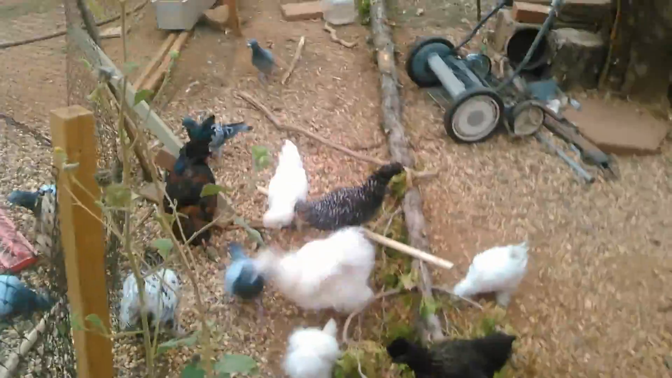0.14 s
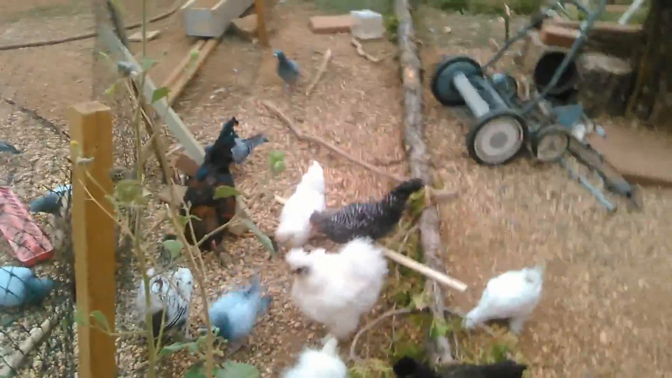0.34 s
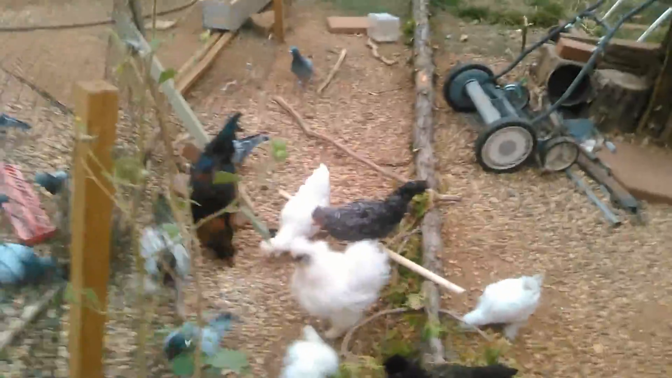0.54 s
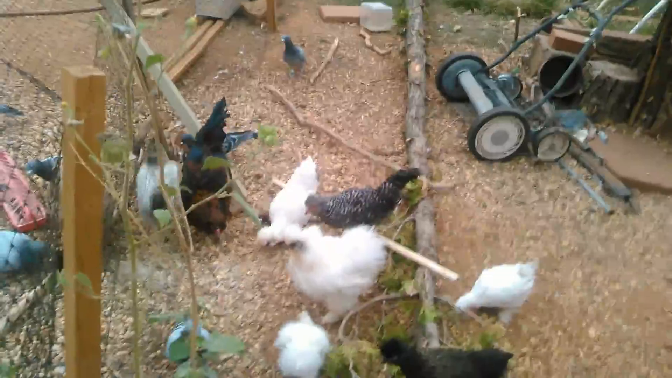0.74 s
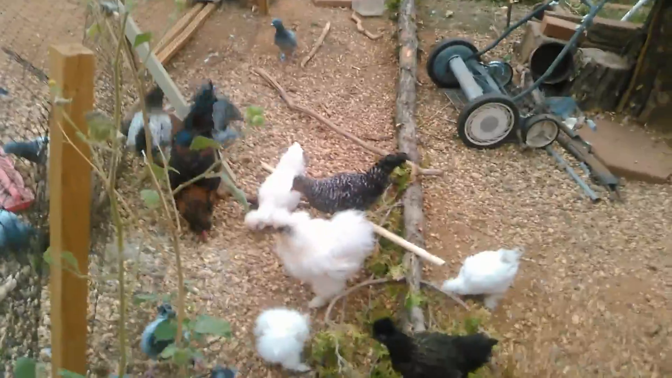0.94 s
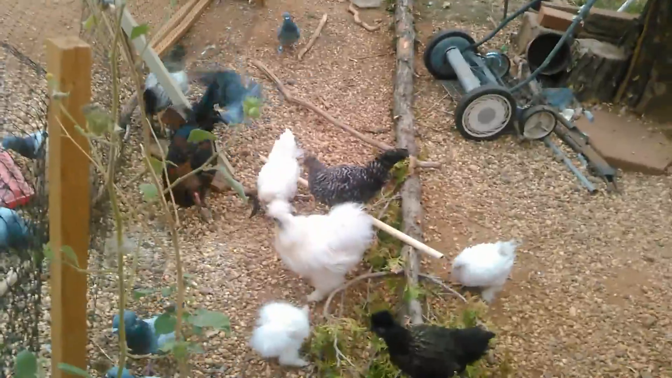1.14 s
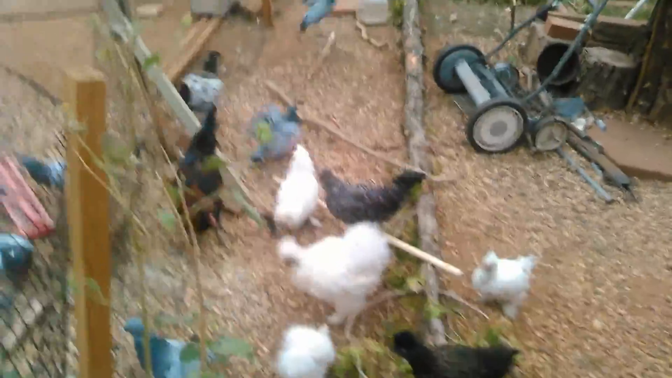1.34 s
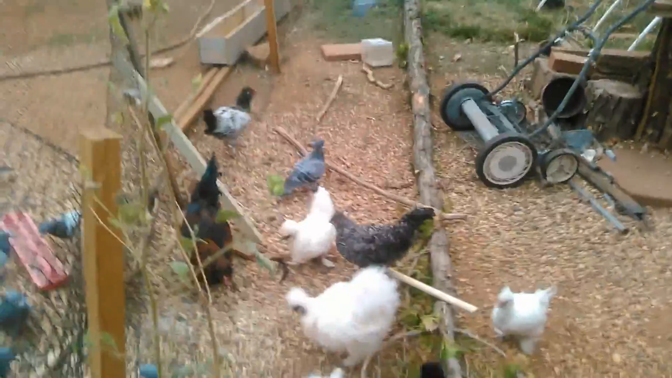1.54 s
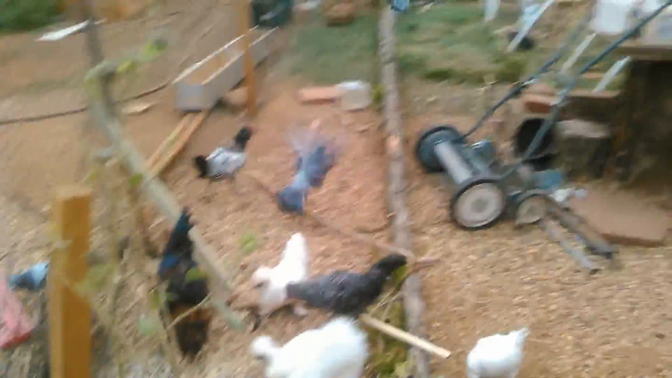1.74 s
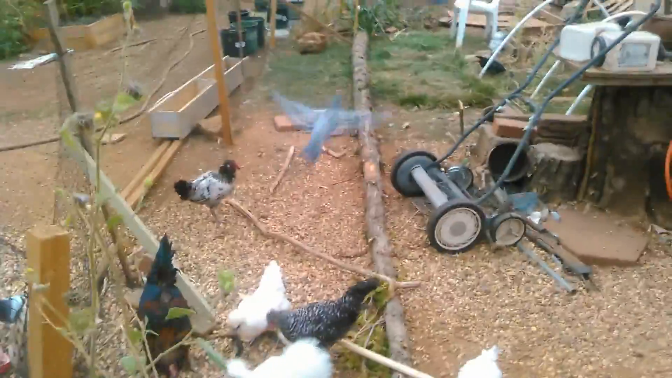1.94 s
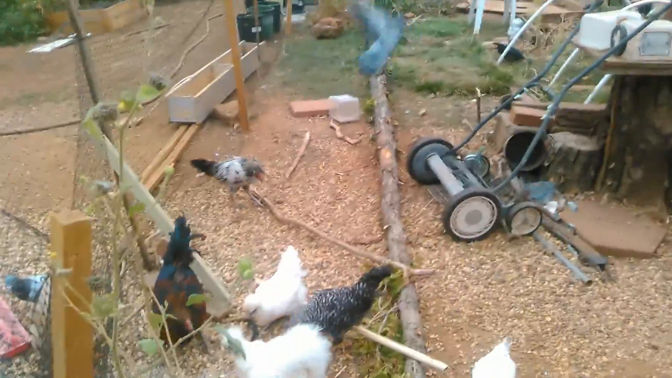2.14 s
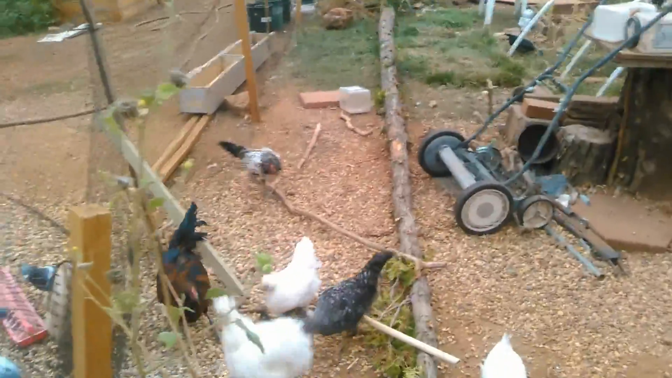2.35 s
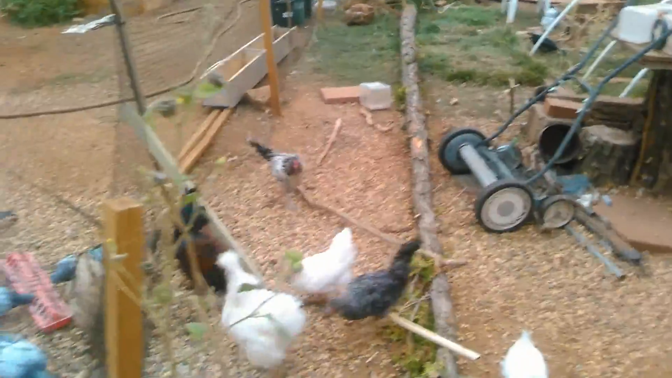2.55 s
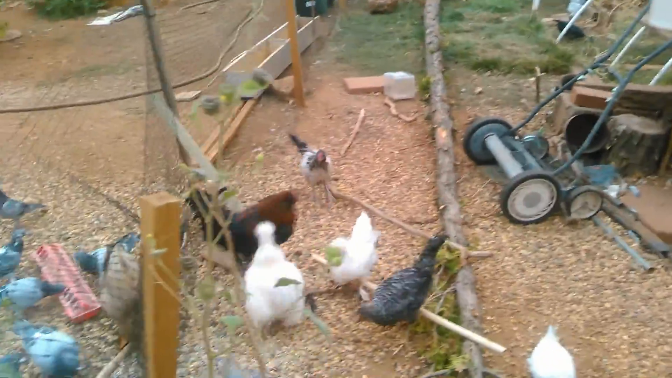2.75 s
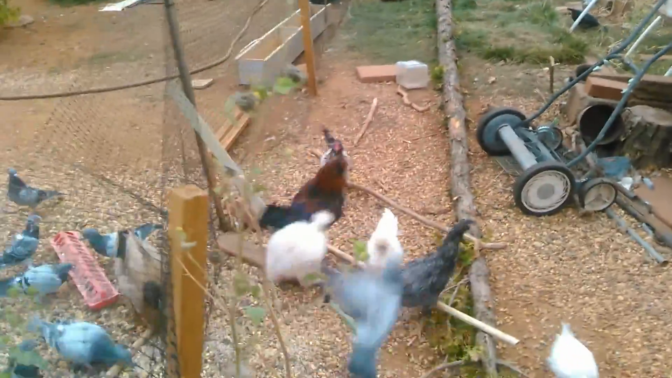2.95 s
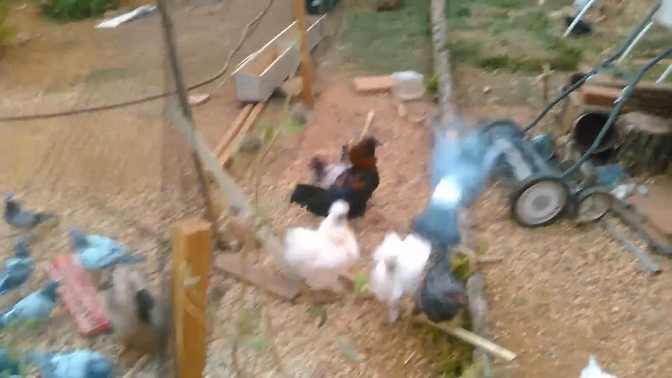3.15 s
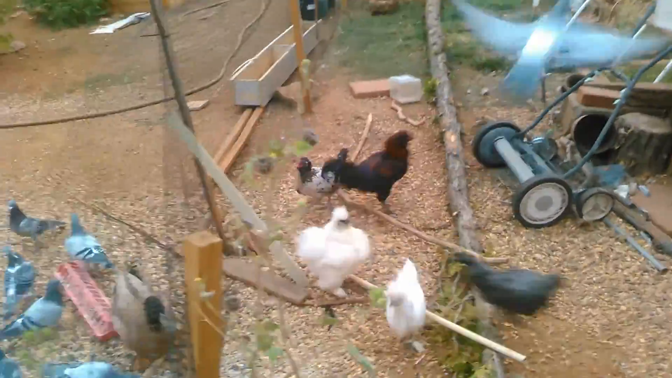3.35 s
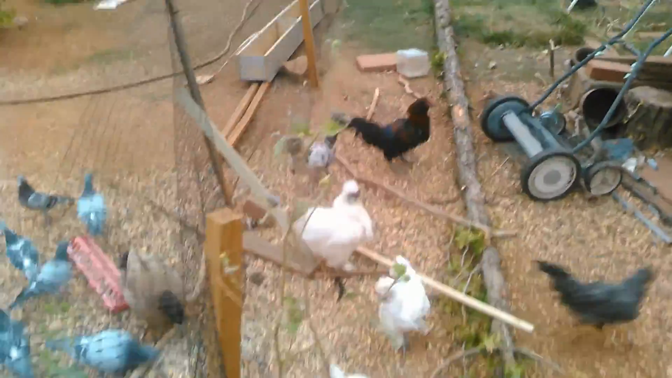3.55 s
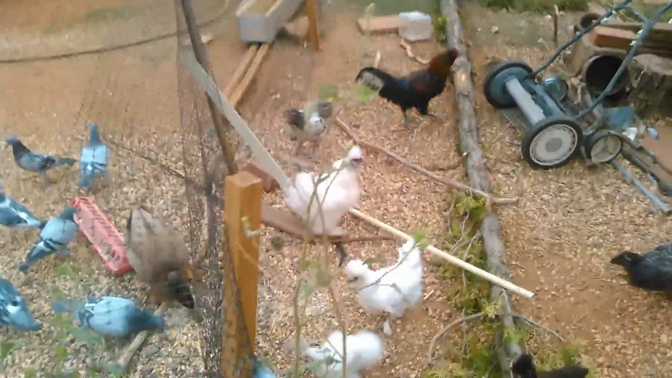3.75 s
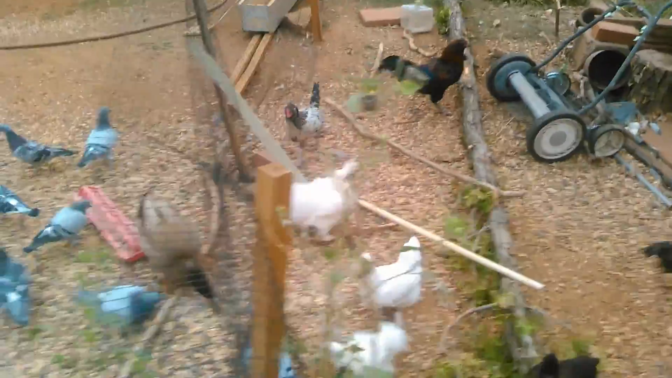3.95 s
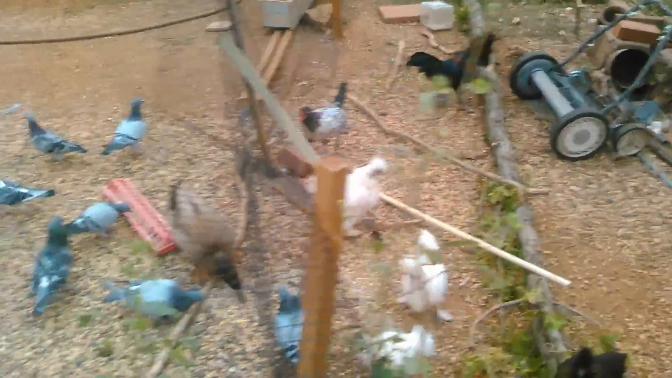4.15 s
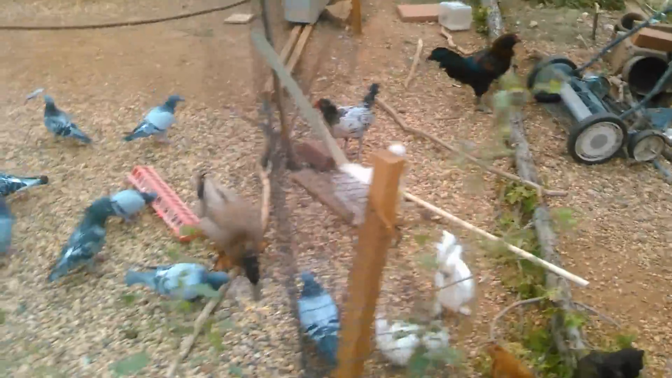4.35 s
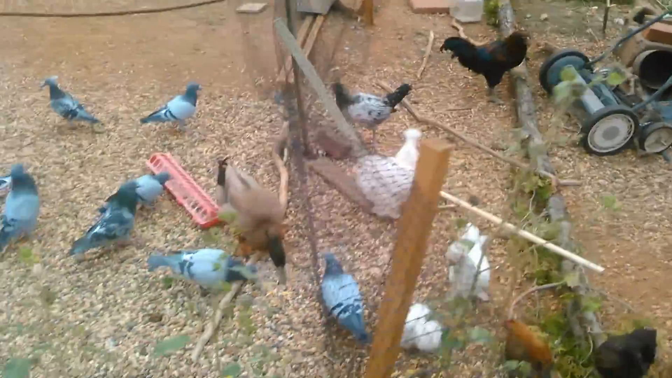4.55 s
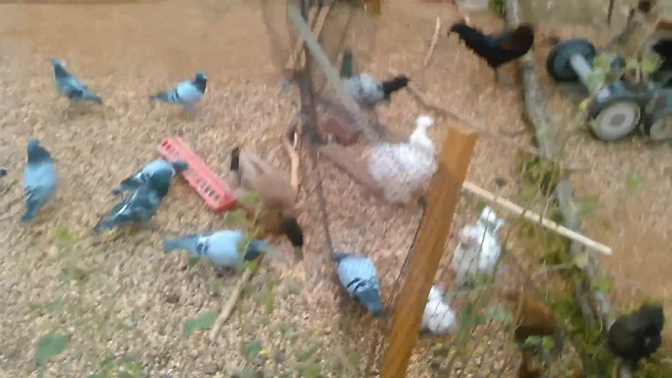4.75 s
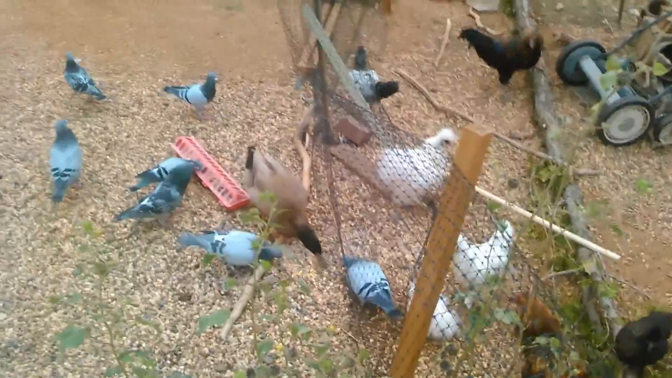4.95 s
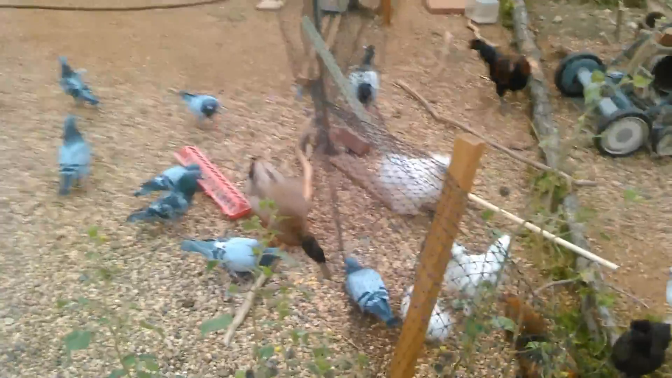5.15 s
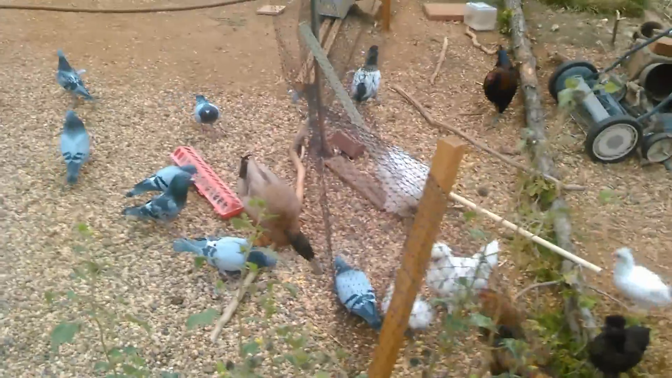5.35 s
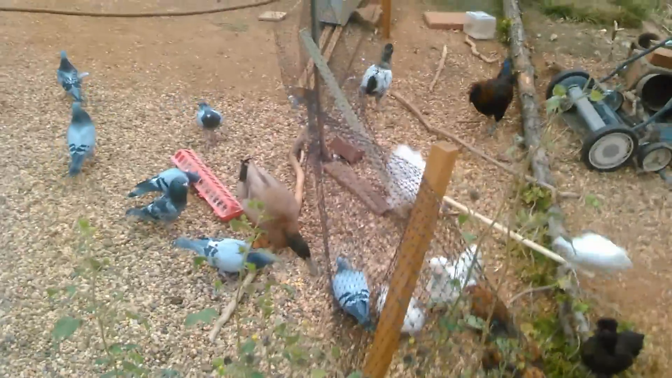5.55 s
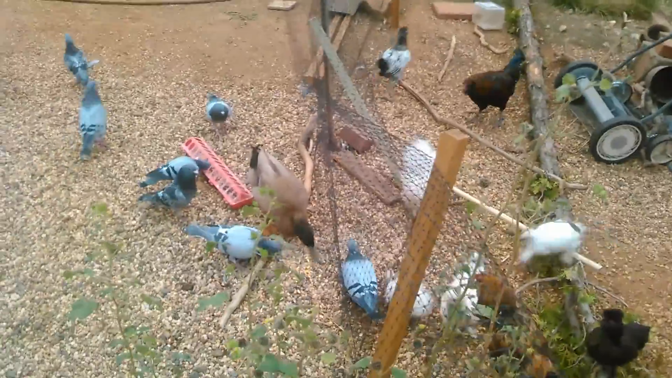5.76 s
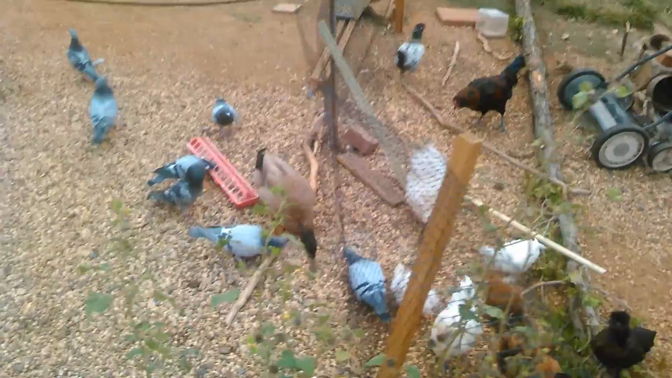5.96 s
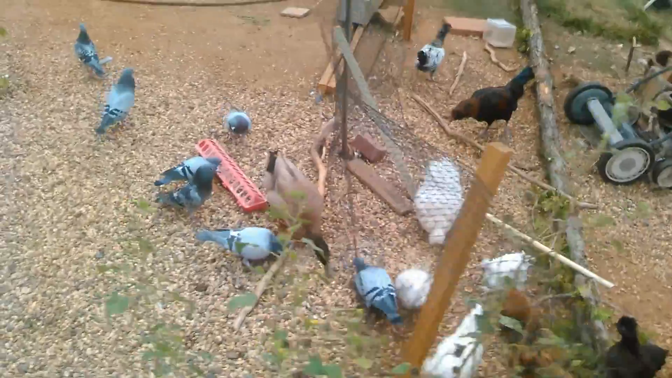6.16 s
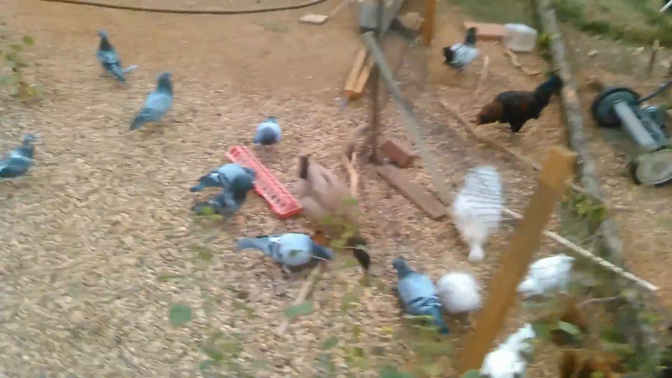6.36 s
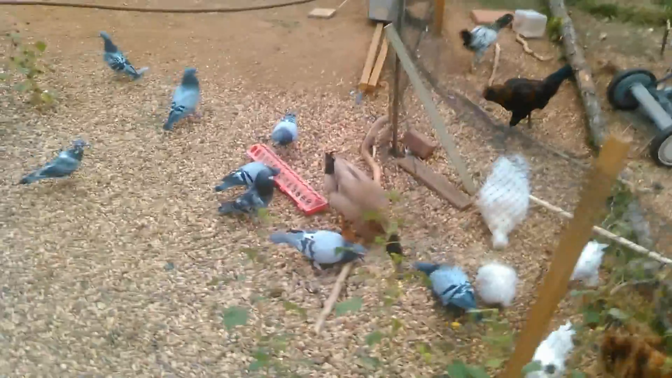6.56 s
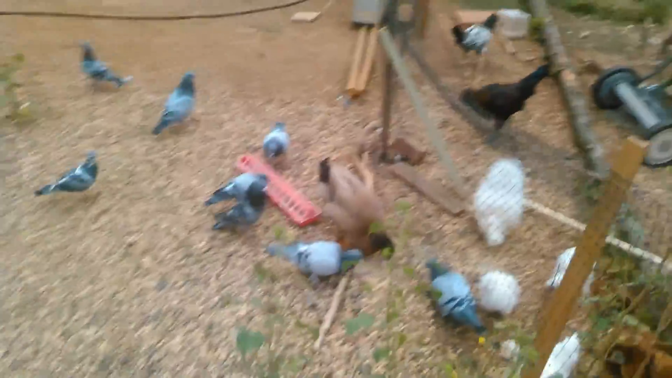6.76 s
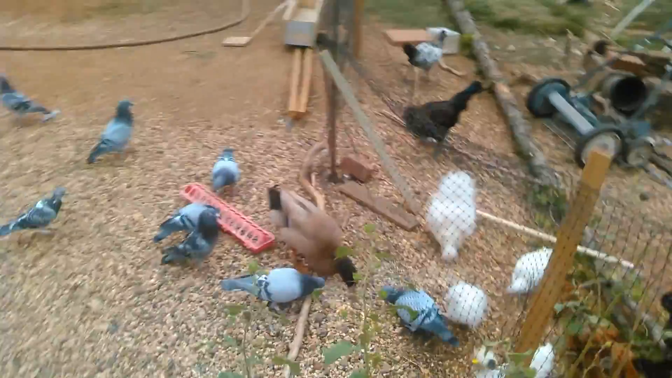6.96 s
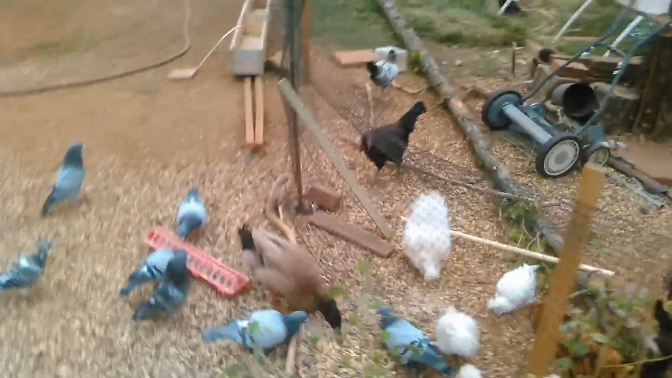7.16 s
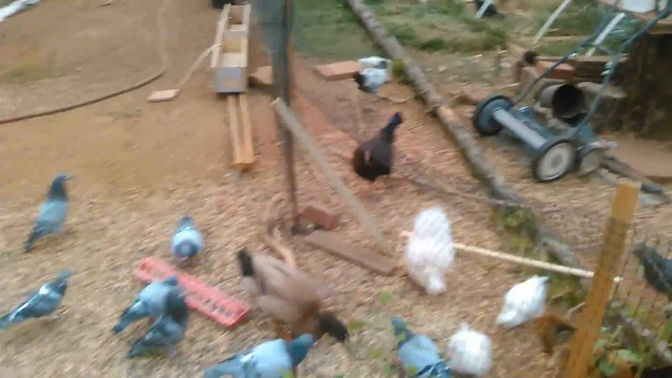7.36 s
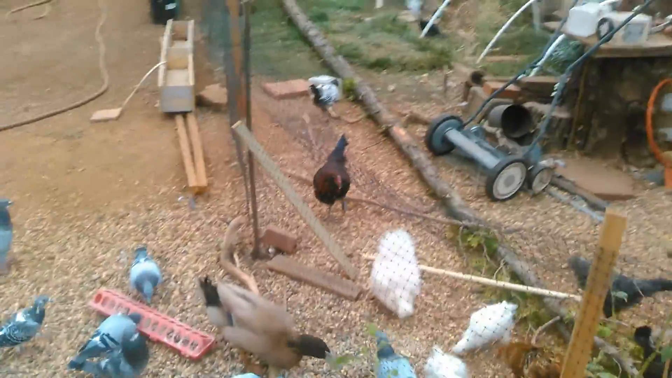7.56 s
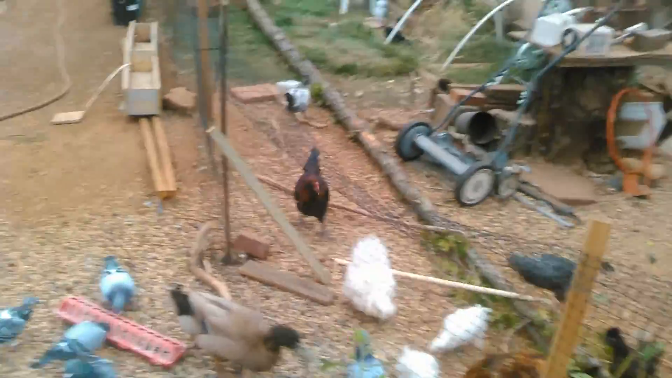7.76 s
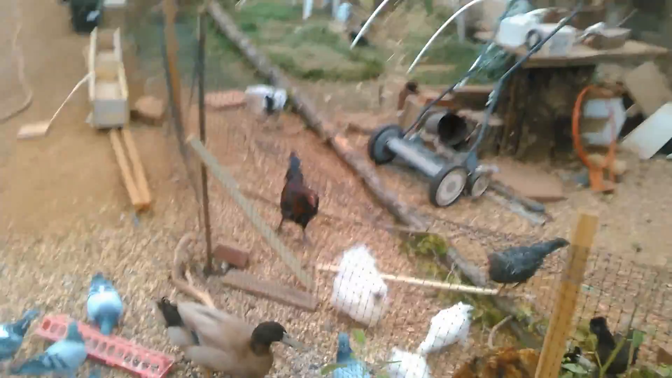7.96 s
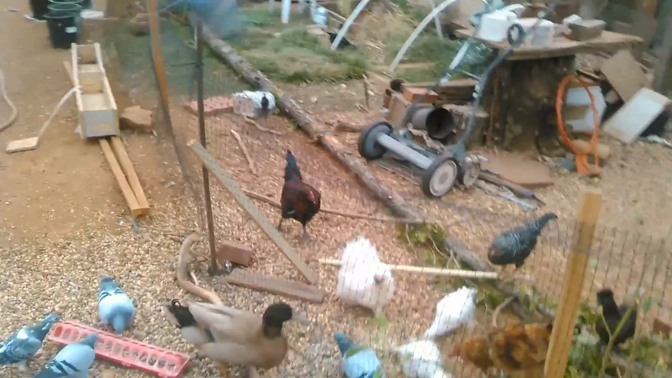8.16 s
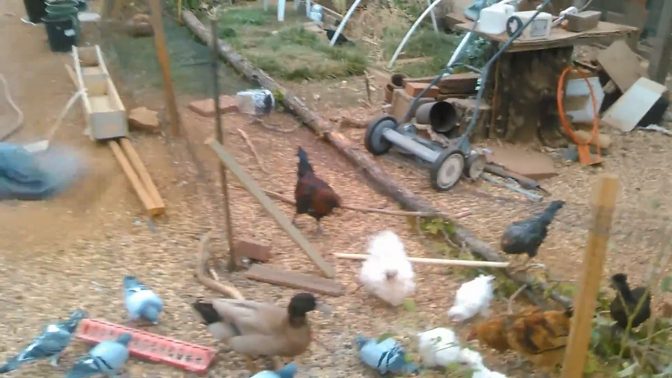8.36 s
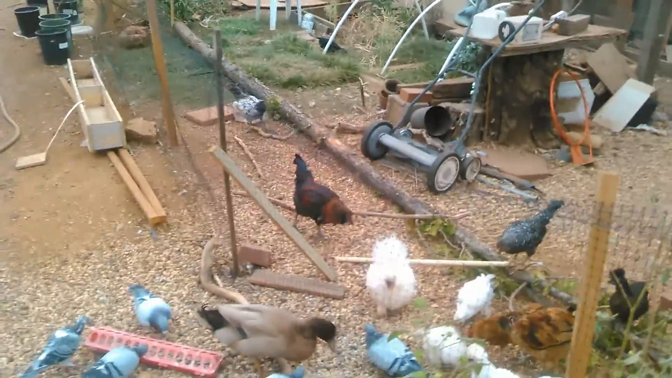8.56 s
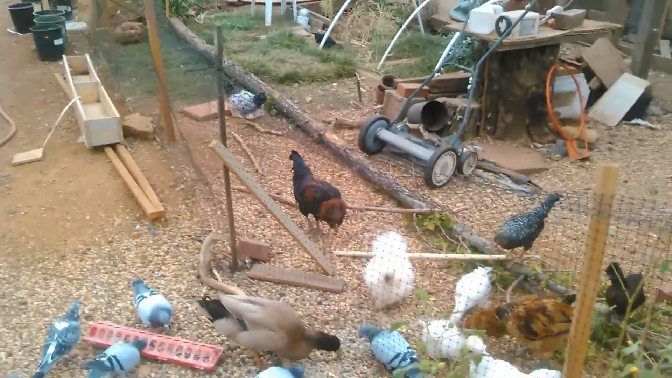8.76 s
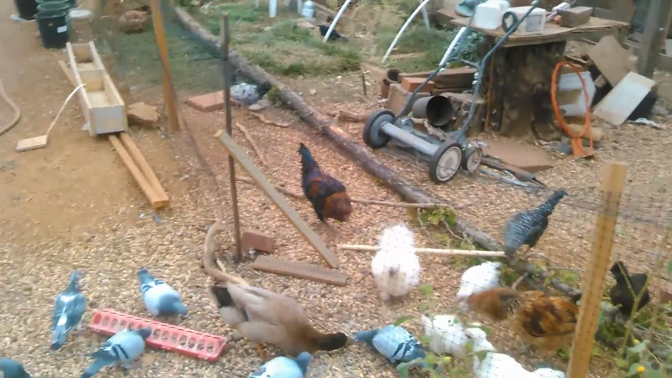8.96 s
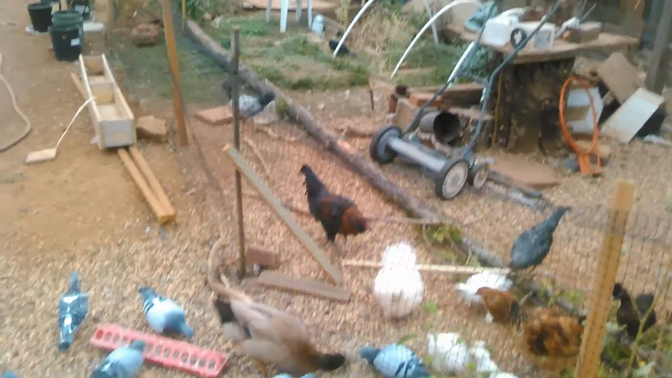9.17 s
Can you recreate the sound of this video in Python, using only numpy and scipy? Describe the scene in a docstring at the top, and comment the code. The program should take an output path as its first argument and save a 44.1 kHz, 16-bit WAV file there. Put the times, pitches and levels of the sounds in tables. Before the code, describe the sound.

Pigeons, chickens and chicks feed on gravel outdoors, close to a simple microphone with a bright, ringing treble. Crisp pecks run throughout over faint air and yard murmur. Two series of rapid wing claps come early, the second the strongest and mixed with hoarse squawks and scuffling. Afterwards sparse peeps, short rattling trills, foot scrapes and low clucks continue, clucks gathering near the end before a weak distant crow.

```python
"""A backyard pen, where pigeons, hens, chicks and young fowl feed on grain scattered over gravel.
Beaks, feet and quills are short noise bursts, clicks and rakes; wings are claps, gliding whirrs, swishes and thuds.
Chicks and a far cock whistle; clucks, squawks and the rattling trills are harmonics through throat spectra.
Shaped noise makes the air, yard, gravel and plumage; a fence tail and a ringing microphone colour the result.
"""
import sys
import numpy as np
from scipy import signal
from scipy.fft import rfft, irfft, next_fast_len
from scipy.io import wavfile
from scipy.ndimage import map_coordinates

SR = 44100
rng = np.random.default_rng(int(sys.argv[2]) if len(sys.argv) > 2 else 0)


def unload_audio(sound):
    """Save the sound as a 16-bit wav file, at the path given as the first command line argument."""
    columns = np.transpose(np.atleast_2d(sound))
    # keep every value between -1 and 1, then stretch to whole-number steps
    steps = np.round(np.clip(columns, -1, 1) * 32767)
    wavfile.write(sys.argv[1], SR, steps.astype(np.int16))


N = 407043

# Levels are relative settings within each layer.
# clearest short clicks: beaks and feet on grain and stones, and a few wing quills:
# (time [s], level [dB], knock level against the click [dB], ring pitch [Hz])
CLICKS = [(0.547, -29.5, -34.0, 4740), (0.718, -31, -12, 4760), (0.736, -22.5, -15.5, 5080),
          (0.8058, -24.5, -23, 5060), (0.8639, -26, -15.5, 5000), (0.9196, -25.5, -37.5, 8100),
          (1.1049, -31, -31, 5150), (1.7011, -23.0, -25, 5190), (1.756, -20.5, -22, 5400),
          (1.8917, -26, -31.0, 4910), (1.9246, -27.5, -31.5, 5620), (2.2289, -25, -15.5, 4860),
          (2.4134, -12.5, -48, 5640), (2.5229, -20, -19, 4740), (2.546, -23, -8.5, 3210),
          (2.645, -23.5, -11, 5810), (2.828, -20, -19, 5990), (2.8854, -10.5, -30, 5600),
          (2.919, -12, -40.0, 5400), (3.1676, -18.0, -23, 5950), (3.3643, -32, -13, 5190),
          (3.6167, -23, -32, 5600), (3.701, -29, -4, 3040), (3.781, -26.5, -36, 8100),
          (3.9788, -27, -31.5, 4840), (4.0928, -25, -19.5, 5700), (4.1795, -27, -20.5, 4670),
          (4.2651, -20, -32, 4020), (4.333, -26.5, -18.5, 4290), (4.676, -25, -21, 3900),
          (4.741, -22.5, -19, 3620), (4.818, -30, -23, 5380), (4.8403, -30, -25.0, 5490),
          (4.9282, -20.5, -28, 5000), (5.03, -25.5, -25, 4890), (5.2203, -28, -19.5, 4800),
          (5.4028, -26, -19.5, 3100), (5.5714, -25.5, -30, 5730), (5.689, -30.5, -12, 3920),
          (5.9738, -24.5, -20, 4130), (6.089, -36, -3.5, 6140), (6.2392, -26.5, -38.5, 6650),
          (6.3815, -24, -9.5, 4310), (6.647, -34.5, -4.5, 5840), (6.789, -32, -21.5, 4100),
          (6.8887, -23, -18, 5150), (6.939, -29.5, -5.5, 3170), (6.99, -25.5, -17, 5470),
          (7.2847, -28, -27, 3980), (7.3608, -16, -33.0, 5400), (7.621, -29.5, -14, 4310),
          (7.965, -34, -19.5, 5530), (8.015, -39, -2.0, 5510), (8.139, -33, -15.5, 2470),
          (8.273, -45, 1.5, 5530), (8.5226, -27, -13, 6140), (9.037, -26.5, -26, 4500),
          (9.0983, -24, -14.5, 5850)]
# chick peeps: (crest time [s], rise [s], fall [s], start pitch [Hz], crest pitch [Hz],
# crest level [dB], shoulder level [dB], low closing note level [dB])
PEEPS = [(0.665, 0.0098, 0.056, 3770, 4110, -41, -50, -80), (2.12, 0.033, 0.042, 1660, 3030, -52, -57, -80),
         (2.294, 0.028, 0.053, 1706, 3450, -43.5, -46.5, -80),
         (3.238, 0.022, 0.048, 3170, 4006, -33.5, -45, -37.5),
         (4.494, 0.016, 0.053, 2750, 4110, -36.5, -39.5, -51),
         (4.701, 0.03, 0.04, 3280, 3900, -41.5, -46, -40.5),
         (5.332, 0.043, 0.0093, 1915, 3410, -52, -49, -37.5),
         (7.67, 0.0224, 0.04, 2600, 3300, -53, -55, -80), (7.812, 0.014, 0.057, 3480, 3700, -60, -54, -80),
         (8.07, 0.012, 0.036, 3280, 3450, -49, -48, -57), (8.546, 0.029, 0.037, 2810, 3276, -48, -54, -80),
         (8.6, 0.0088, 0.026, 3170, 3300, -57, -54, -50), (8.748, 0.01, 0.036, 3370, 3450, -59, -52, -80),
         (8.944, 0.03, 0.037, 2130, 3350, -50.5, -56, -80),
         (9.021, 0.024, 0.029, 2920, 3115, -58, -44, -53)]
# hen clucks: (time [s], length [s], crest pitch [Hz], level [dB])
CLUCKS = [(0, 0.042, 386, -50.5), (0.206, 0.025, 394, -50.5), (1.932, 0.095, 377, -64),
          (3.188, 0.16, 397, -62), (3.82, 0.043, 408, -60), (3.941, 0.067, 410, -64),
          (4.25, 0.27, 394.6, -63.5), (4.645, 0.05, 389, -55), (6.74, 0.063, 440, -60),
          (7.022, 0.02, 451, -53.5), (7.129, 0.039, 444, -58), (7.24, 0.045, 448, -58),
          (7.489, 0.039, 435, -64), (7.599, 0.036, 436, -55), (7.747, 0.041, 415, -57.5),
          (8.168, 0.044, 399, -47), (8.294, 0.033, 420, -48), (8.417, 0.026, 435, -50),
          (8.542, 0.0265, 439, -54)]
# thin whines and short piped notes of hens and chicks: (time [s], length [s], pitch [Hz],
# start pitch [ratio], level [dB], unsteadiness [share of pitch])
THIN_NOTES = [(0.855, 0.044, 1203, 1.1, -49.5, 0.069), (1.307, 0.041, 1154, 1.26, -39.5, 0.02),
              (1.439, 0.258, 943, 1.22, -38.5, 0.017), (1.792, 0.065, 1134, 0.64, -41, 0.029),
              (1.939, 0.056, 1125, 0.78, -52, 0.046), (2.007, 0.057, 1750, 0.92, -49, 0.026),
              (2.021, 0.037, 1294, 0.9, -48, 0.052), (4.28, 0.07, 1127, 0.86, -53, 0.014),
              (4.971, 0.019, 1370, 1.05, -43, 0.038), (7.596, 0.039, 1650, 0.86, -52, 0.02),
              (8.633, 0.054, 1624, 1.26, -44, 0.09)]
# rattling trills of young fowl: (time [s], length [s], pitch [Hz], level [dB], brightness [dB])
RATTLES = [(0.636, 0.037, 748, -53.5, -16), (0.701, 0.035, 763, -57, -20), (3.409, 0.05, 764, -54, -10),
           (3.514, 0.083, 785, -52.5, -16.5), (4.517, 0.063, 735, -51, -8), (4.705, 0.02, 840, -48, -3),
           (5.642, 0.057, 817, -45.5, -11), (5.752, 0.085, 862, -51.5, -12), (6.143, 0.053, 907, -53.5, 9),
           (6.379, 0.05, 762, -47, -2), (6.49, 0.092, 581, -52, 0), (6.886, 0.073, 590, -44.5, 1.5),
           (7.625, 0.062, 944, -46, -5), (7.857, 0.066, 790, -41, 1), (8.107, 0.039, 620, -50.5, 3),
           (8.452, 0.06, 611, -48.5, -6), (8.698, 0.046, 570, -42, -8)]
# a hen's hoarse squawks: (time [s], length [s], start pitch [Hz], end pitch [Hz], level [dB], brightness [dB])
SQUAWKS = [(2.513, 0.023, 850, 650, -39.5, 3), (2.608, 0.061, 974, 852, -38, -8),
           (2.674, 0.027, 740, 793, -30.5, -13)]
# contour of the far crow: (time [s], pitch [Hz], level [dB], unsteadiness [share of pitch])
CROW = [(8.719, 1358, -52, 0.068), (8.77, 1285, -52, 0.039), (8.85, 1278, -53, 0.025),
        (8.88, 1327, -53.5, 0.087), (9.0, 1475, -51, 0.11), (9.12, 1335, -56.5, 0.11),
        (9.23, 1380, -53, 0.084)]
# pigeon wingbeats: (clap time [s], clap level [dB], upstroke level [dB], downstroke level [dB])
WINGBEATS = [(0.772, -50, -53, -71), (0.938, -50, -68, -46.5), (1.048, -24.5, -45, -48),
             (1.1577, -12, -46, -49.5), (1.27, -15, -46, -49), (1.387, -16, -51, -47.5),
             (1.502, -15, -45.5, -48), (1.625, -25.5, -47.5, -50), (1.7426, -21, -48.5, -51),
             (1.8584, -21, -52, -54), (1.9867, -24, -52, -50), (2.335, -22, -61, -53),
             (2.4566, -25, -50.5, -59), (2.5892, -14.5, -46.5, -43), (2.6872, -3, -48.5, -41),
             (2.794, -8.5, -42, -45), (2.9024, -10.5, -39, -44), (3.018, -13.5, -57, -62),
             (3.1377, -11.5, -54, -54), (8.302, -42, -66, -61), (8.406, -28.5, -53, -55),
             (8.576, -47, -45, -72)]
# low thuds of air pushed by wings: (time [s], level [dB], pitch [Hz])
PUFFS = [(0.738, -34, 138), (0.954, -39, 81), (0.981, -37, 59), (1.287, -40, 79), (1.333, -40, 87),
         (1.447, -39, 79), (1.515, -36, 117), (1.592, -36, 107), (1.708, -33, 106), (2.349, -35, 77),
         (2.557, -36, 86), (2.591, -25, 91), (2.657, -32, 69), (2.766, -30, 74), (2.8, -34, 72),
         (2.862, -26, 70), (2.976, -30.5, 74), (3.028, -37, 60), (3.093, -37, 87), (3.139, -37, 44),
         (7.231, -36.5, 124), (7.347, -37, 95), (7.462, -35, 68), (8.18, -43, 98), (8.305, -40, 60),
         (8.354, -35, 55), (8.408, -31.5, 147), (8.555, -38, 111)]
# feet raking through the gravel: (time [s], length [s], grit level [dB], stones level [dB])
SCRAPES = [(0.117, 0.045, -52, -74.5), (0.86, 0.023, -69, -58), (2.598, 0.061, -46, -46),
           (3.606, 0.045, -47, -56), (4.628, 0.015, -49.5, -64), (4.674, 0.11, -52, -52),
           (4.812, 0.041, -54, -54), (6.138, 0.053, -67, -51.5), (6.879, 0.113, -55, -47.5),
           (8.037, 0.062, -57, -51.5), (8.518, 0.056, -55.5, -48), (8.625, 0.025, -44.5, -69),
           (9.114, 0.039, -53, -70)]

# gravel stirred by the flock: (time [s], level [dB])
SCUFFLE_LEVEL = [(0.0, -45.5), (0.25, -52.5), (0.69, -49), (1.1, -48), (2.26, -46.5), (2.78, -38),
                 (3.19, -44.5), (3.57, -43.5), (3.78, -50.5), (5.19, -55), (6.25, -50), (6.4, -55),
                 (6.66, -56.5), (6.86, -49.5), (7.22, -53), (7.38, -50.5), (8.66, -51), (9.23, -55)]
# open yard's murmur: (time [s], level [dB])
MURMUR_LEVEL = [(0.0, -58.5), (0.31, -65), (0.77, -59.5), (1.31, -57.5), (2.08, -57.5), (2.52, -53.5),
                (2.72, -48), (3.29, -57), (3.93, -59.5), (4.37, -60.5), (5.19, -61.5), (8.07, -56.5),
                (8.33, -53), (9.23, -58)]
# low moving air: (time [s], level [dB])
DRAUGHT_LEVEL = [(0.0, -55), (0.41, -55), (1.21, -48), (2.16, -50), (2.8, -47.5), (3.5, -51), (6.17, -56),
                 (7.43, -53.5), (7.94, -54.5), (8.41, -48), (8.71, -59), (9.23, -55.5)]
# fine hiss of feathers: (time [s], level [dB])
PLUMAGE_LEVEL = [(0.0, -55), (0.28, -59), (2.13, -62.5), (2.78, -51.5), (3.19, -54), (3.57, -56.5),
                 (3.85, -63.5), (5.6, -64.5), (6.2, -63), (6.38, -67.5), (8.25, -64), (9.23, -65)]
# fall of a peep from crest to break: (time [share of fall], pitch left above the break [share])
PEEP_FALL = [(0, 1), (0.18, 0.88), (0.45, 0.38), (0.75, 0.22), (1, 0)]

# spectrum of the low moving air: (frequency [Hz], level [dB])
AIR = [(13, -51), (22, -34), (36, -9), (54, 6), (70, -2), (81, 4.5), (95, 2.5), (108, -8), (220, -24),
       (290, -48), (480, -120)]
# spectrum of the open yard: (frequency [Hz], level [dB])
YARD = [(76, -20), (130, 3), (158, -1.5), (351, -5), (617, -5.5), (907, -7.5), (1620, -8.5), (2800, -17.5),
        (3450, -13.5), (4500, -28.5), (5850, -18), (9900, -120)]
# spectrum of fine gravel: (frequency [Hz], level [dB])
GRAVEL = [(1200, -59), (2500, -15), (4000, -9), (5500, -1), (7000, -8.5), (8500, -8.5), (10000, -20),
          (13000, -27)]
# spectrum of larger stones: (frequency [Hz], level [dB])
STONES = [(1200, -49), (2800, 4.5), (4300, 0), (6000, 7.5), (8000, -14)]
# spectrum of rustling feathers: (frequency [Hz], level [dB])
FEATHERS = [(5000, -24), (7500, -21), (9000, 0), (10300, -4), (12000, -3), (13500, -12), (15500, -7)]
# spectrum of slapping quills: (frequency [Hz], level [dB])
SNAP = [(1200, -20), (2400, -2.5), (3600, -2), (5500, 10.5), (7000, -3.5), (8500, -2), (10000, -14),
        (12500, -11), (16000, -83)]
# spectrum of a clap's papery body: (frequency [Hz], level [dB])
BODY = [(80, 5), (250, -2.5), (500, 4), (900, 0), (1500, 2.5), (2300, -11.5), (4000, -15)]
# spectrum of air through the wing feathers: (frequency [Hz], level [dB])
SWISH = [(150, -30), (500, -7), (900, 5.5), (1600, 1), (2300, -11), (4000, -4), (8000, -15)]
# spectrum of a click on grain: (frequency [Hz], level [dB])
GRAIN = [(1200, -42), (2400, -20), (3600, -3), (4700, 6.5), (5700, 3.5), (7000, -14), (8500, -8),
         (10000, -13), (12500, -21), (16000, -24)]
# spectrum of a knock on the ground: (frequency [Hz], level [dB])
KNOCK = [(150, -16.5), (500, -1.5), (1000, 2.5), (1600, 5.5), (2600, -6.5), (4500, -23)]
# throat response of the clucking hen: (frequency [Hz], level [dB])
HEN_THROAT = [(300, 7), (420, -15), (600, -28), (780, 3.5), (1150, -26), (1650, -6.5), (2200, -18),
              (2800, -18), (4000, -17)]
# throat response of the squawking hen: (frequency [Hz], level [dB])
SQUAWK_THROAT = [(500, 0), (850, -9), (1650, -2), (2400, -24), (3600, -8.5), (5000, -3), (7000, -28)]
# throat response of the rattling trills: (frequency [Hz], level [dB])
RATTLE_THROAT = [(700, -27), (1150, -16.5), (1450, 1.5), (1850, 4), (2300, 1), (2800, -3.5), (3400, -9.5),
                 (4200, -9), (5000, -14), (7000, -32)]
# ringing of fence and sheds: (frequency [Hz], time to fall 60 dB [s])
FENCE = [(200, 0.076), (1500, 0.12), (6000, 0.077), (15000, 0.088)]

# background trims, and the finest grit of a scrape against the rest
GRAVEL_DB, FEATHER_DB, YARD_DB, AIR_DB = 0, -2, 7.5, 1.5
SCRAPE_FINE_DB, SCRAPE_EDGE = -5, 0.12  # edge: share of a stroke spent rising and fading
# random pecks from the rest of the flock, on the scales of the click table
FAINT_PECKS_PER_S, FAINT_PECK_DB, FAINT_SPREAD_DB, FAINT_KNOCK_DB = 2.9, -31.5, 1, -30
FAINT_RING_HZ, FAINT_RING_SPREAD = 4770, 0.263  # centre pitch and log scatter of their rings
RING_Q, RING_DB = 9.6, 5  # every click's ring, its level against the click
BRUSH_S, BRUSH_DB = 0.005, -28.5  # feathers brush just before they clap
UP_LEAD_S, UP_S, UP_HZ = 0.039, 0.0352, 478  # upstroke: lead before the clap, typical length and pitch
DOWN_LAG_S, DOWN_S, DOWN_HZ = 0.026, 0.03476, 996  # downstroke: lag after the clap, typical length and pitch
UP_TONE_DB, UP_SWISH_DB, DOWN_TONE_DB, DOWN_SWISH_DB = 1, -13, -4, -1
UP_DROP_DB, UP_DROP_OCTAVES = (-47, -41), 0.35  # across these levels louder upstrokes sink by up to this
STROKE_SPREAD = 0.1  # share by which strokes differ in pitch and length
PUFF_CYCLES = 0.47  # Gaussian half-width of a thud in cycles of its pitch
CLUCK_ARCH = 0.0788  # share by which both ends of a cluck lie under its crest pitch
THIN_SETTLE_S, THIN_ATTACK_S, THIN_RELEASE_S = 0.0106, 0.0073, 0.015
THIN_SAG, THIN_CLIMB_PER_S, THIN_WANDER = 0.053, 0.25, 0.012  # shares of the pitch
BREAK_HZ, LOW_NOTE_HZ, DROP_S, LOW_NOTE_S = 2745, 1448, 0.00986, 0.026  # where a peep cracks and drops
TRILL_HZ = 97
RASP_HZ, RASP_SLOWING_PER_S = 86.3, 3.87  # pulse rate at the start of a rattle, and its decay rate
RASP_SWEEP, RASP_ARCH = 0.333, 0.081  # log pitch rise within each pulse and over the whole call
RATTLE_HOARSE_DB = -7
MIC_HZ, MIC_WIDTH_HZ, MIC_DB = 5550, 1030, 7
LOW_HZ, TOP_HZ = 28.1, 16100


def amp(db):
    """Decibels to gain."""
    return 10 ** (np.asarray(db) / 20)


def unit(x):
    """Scale to rms 1."""
    return x / np.sqrt(np.mean(x ** 2) + 1e-20)


def along(points, hz):
    """Read (frequency, value) points on a log frequency axis."""
    f, v = np.transpose(points)
    return np.interp(np.log(hz + 1), np.log(f + 1), v)


def clock(length):
    """Sample times of a short sound."""
    return np.arange(max(int(length * SR), 8)) / SR


def level(rows):
    """Gain for each sample from (time, level) points."""
    s, db = np.transpose(rows)
    return amp(np.interp(np.arange(N) / SR, s, db))


def wobble(rate, size):
    """Smooth random curve, rate knots a second."""
    knots = rng.standard_normal(int(size * rate / SR) + 4)
    return map_coordinates(knots, [np.arange(size) * rate / SR])


def add(track, s, sound):
    """Mix a sound in at time s."""
    start = int(np.clip(round(s * SR), 0, N - 1))
    track[start:start + len(sound)] += sound[:N - start]


def colour(x, points, size=2048):
    """Minimum-phase filter of unit energy with the given spectrum."""
    cepstrum = irfft(np.log(amp(along(points, np.fft.rfftfreq(size, 1 / SR)))))
    # folding the cepstrum puts all its weight after the onset
    cepstrum[1:size // 2] *= 2
    cepstrum[size // 2 + 1:] = 0
    kernel = irfft(np.exp(rfft(cepstrum)))
    return signal.fftconvolve(x, kernel / np.linalg.norm(kernel))[:len(x)]


def hiss(points):
    """Coloured noise of rms 1."""
    return unit(colour(rng.standard_normal(N), points))


def swell(t, edge):
    """Soft onset and release of rms 1; edge is the share of the sound they take together."""
    return unit(signal.windows.tukey(len(t), np.clip(edge, 0, 1)))


def burst(decay, bounce, crack):
    """A sharp crack and a burst of noise, repeated about 3 ms later off the ground; unit energy."""
    t = clock(.04)
    x = np.exp(-t / decay) * rng.standard_normal(len(t))
    x /= np.linalg.norm(x)
    x[0] = crack
    lag = int(SR * rng.uniform(.0024, .0038))
    x = x + bounce * np.pad(x, (lag, 0))[:len(t)]
    return x / np.linalg.norm(x)


def struck(x, points):
    """A short contact sound with the given spectrum; unit energy."""
    x = colour(x, points)
    return x / np.linalg.norm(x)


def crackle(rate, spread_db, decay):
    """Envelope of rms 1: tiny contacts of uneven size at random times, each dying away."""
    sizes = amp(spread_db * np.minimum(rng.exponential(size=N), 2))
    contacts = (rng.random(N) < rate / SR) * sizes
    return unit(signal.lfilter([1], [1, -np.exp(-1 / (decay * SR))], contacts))


def phase_of(hz, jitter, rate):
    """Phase of an unsteady pitch."""
    return 2 * np.pi * np.cumsum(hz * (1 + jitter * wobble(rate, len(hz)))) / SR


def whistle(hz, jitter, rate, overtone_db):
    """An unsteady tone of rms 1 with a weak octave."""
    phase = phase_of(hz, jitter, rate)
    return unit(np.sin(phase) + amp(overtone_db) * np.sin(2 * phase))


def background():
    """Low moving air, the open yard, gravel stirred by many feet, and the fine hiss of feathers."""
    air = amp(AIR_DB) * level(DRAUGHT_LEVEL) * hiss(AIR)
    yard = amp(-4.0 + 2.7 * wobble(25, N)) * hiss(YARD)
    steps = amp(-12.0) * crackle(rate=45, spread_db=5.5, decay=0.0039) * hiss(KNOCK)
    murmur = amp(YARD_DB) * level(MURMUR_LEVEL) * (yard + steps)
    # fine grit ticks high, larger stones lower
    ticks = crackle(rate=100, spread_db=12.5, decay=0.00094)
    stones = amp(-10.5) * crackle(rate=50, spread_db=14.5, decay=0.0062) * hiss(STONES)
    stir = unit(amp(2.68 * wobble(30, N) + 1.87 * wobble(110, N)))
    gravel = (amp(-14.0) * ticks + amp(-6.0) * stir) * hiss(GRAVEL) + stones
    feathers = (amp(-3.5) * ticks + amp(0.5) * np.sqrt(stir)) * hiss(FEATHERS)
    scuffle = amp(GRAVEL_DB) * level(SCUFFLE_LEVEL) * gravel
    plumage = amp(FEATHER_DB) * level(PLUMAGE_LEVEL) * feathers
    return air + murmur + scuffle + plumage


def hen_clucks():
    """Soft, slightly hoarse clucks: harmonics through a throat that favours the second."""
    out, k = np.zeros(N), np.arange(1, 11)[:, None]
    for s, length, crest_hz, db in CLUCKS:
        t = clock(length)
        hz = crest_hz * (1 - CLUCK_ARCH * (2 * t / length - 1) ** 2)
        phase = phase_of(hz, jitter=0.038, rate=340)
        voice = unit((amp(along(HEN_THROAT, k * hz)) * np.sin(k * phase)).sum(0))
        # breath noise pulses with the voice
        breath = (1 + np.cos(phase)) * rng.standard_normal(len(t))
        hoarse = unit(colour(breath, HEN_THROAT))
        add(out, s, amp(db + 5.0) * swell(t, edge=0.34) * (voice + amp(-13.0) * hoarse))
    return out


def fence(x):
    """Fence and sheds return a short, weak tail: noise that decays at its own pace in each band."""
    hz, t, bands = signal.stft(rng.standard_normal(SR // 2), SR, nperseg=256)
    decay = amp(-60 * t / along(FENCE, hz)[:, None])
    tail = signal.istft(bands * decay, SR, nperseg=256)[1]
    delayed = np.pad(x, (SR // 150, 0))
    return signal.fftconvolve(delayed, tail / np.linalg.norm(tail))[:N]


def scrapes():
    """A foot rakes the ground: a short, grainy rush of grit over the duller rub of stones."""
    grit, stones = np.zeros((2, N))
    for s, length, grit_db, stones_db in SCRAPES:
        t = clock(length)
        stroke = unit(swell(t, edge=SCRAPE_EDGE) * amp(1.6 * wobble(210, len(t))))
        add(grit, s, amp(grit_db) * stroke)
        add(stones, s, amp(stones_db) * stroke)
    grit_noise = hiss(GRAVEL) + amp(SCRAPE_FINE_DB) * hiss(FEATHERS)
    return grit * grit_noise + stones * hiss(KNOCK)


def clicks():
    """Beaks, feet and a few quills click, ring at their own pitch and knock; fainter pecks fall at random."""
    out = np.zeros(N)
    faint = []
    for when, force, size in rng.random((int(FAINT_PECKS_PER_S * N / SR), 3)):
        db = FAINT_PECK_DB + FAINT_SPREAD_DB * (2 * force - 1)
        ring_hz = FAINT_RING_HZ * np.exp(FAINT_RING_SPREAD * (2 * size - 1))
        faint.append((when * N / SR, db, FAINT_KNOCK_DB, ring_hz))
    for s, db, knock_db, ring_hz in list(CLICKS) + faint:
        tick = burst(decay=0.0012, bounce=0.47, crack=0.7)
        ring = signal.lfilter(*signal.iirpeak(min(ring_hz, TOP_HZ), RING_Q, fs=SR), tick)
        click = struck(tick, GRAIN) + amp(RING_DB) * ring / np.linalg.norm(ring)
        knock = struck(burst(decay=0.0031, bounce=0.69, crack=0.32), KNOCK)
        add(out, s, amp(db + 7) * click / np.linalg.norm(click))
        add(out, s, amp(db + knock_db + 21.0) * knock)
    return out


def rattles():
    """A rattling trill is a slowing run of tiny squawks, each sweeping steeply upward through the throat."""
    squawk, hoarse = np.zeros((2, N))
    k = np.arange(1, 11)[:, None]
    for s, length, pitch_hz, db, bright_db in RATTLES:
        t = clock(length)
        rasp_hz = RASP_HZ * np.exp(-RASP_SLOWING_PER_S * t)
        cycle = phase_of(rasp_hz, jitter=.07, rate=60) / (2 * np.pi) % 1
        pulse = np.sin(np.pi * cycle ** 1.2) ** 4 + .18
        shape = amp(db) * unit(swell(t, edge=.5) * pulse * amp(2 * wobble(70, len(t))))
        arc = np.sin(np.pi * t / t[-1]) - .8
        bend = RASP_SWEEP * (cycle - .55) + RASP_ARCH * arc + .04 * wobble(70, len(t))
        hz = pitch_hz * np.exp(bend)
        # brightness lifts or dulls the upper partials; each also has a random level
        tilt = bright_db * (k * pitch_hz > 2100) + rng.normal(0, 1.5, k.shape)
        throat = amp(along(RATTLE_THROAT, k * hz) + tilt)
        phase = phase_of(hz, jitter=.036, rate=1200)
        partials = np.sin(k * phase + rng.uniform(0, 2 * np.pi, k.shape))
        add(squawk, s, shape * unit((throat * partials).sum(0)))
        add(hoarse, s, shape * rng.standard_normal(len(t)))
    return squawk + amp(RATTLE_HOARSE_DB) * colour(hoarse, RATTLE_THROAT)


def peeps():
    """Each whistle arches and eases over a shoulder; some then crack and drop to a low, fluttering note."""
    out = np.zeros(N)
    for s, rise, fall, start_hz, crest_hz, crest_db, shoulder_db, low_db in PEEPS:
        t = clock(rise + fall + LOW_NOTE_S) - rise  # zero at the crest
        arch = crest_hz - (crest_hz - start_hz) * (t / rise) ** 2
        shoulder = BREAK_HZ + (crest_hz - BREAK_HZ) * np.interp(t / fall, *np.transpose(PEEP_FALL))
        drop = np.exp(-np.maximum(t - fall, 0) / DROP_S)
        low_note = LOW_NOTE_HZ + (BREAK_HZ - LOW_NOTE_HZ) * drop
        hz = np.select([t < 0, t < fall], [arch, shoulder], low_note)
        # a very low closing level leaves the drop unheard
        db = np.interp(t, [-rise, 0, .6 * fall, fall, fall + DROP_S],
                       [crest_db - 4, crest_db, shoulder_db, shoulder_db - 3, low_db])
        rough = np.clip(.014 * amp((-45 - db) / 2), .01, .035)  # soft peeps are less steady
        phase = phase_of(hz, jitter=rough, rate=700)
        overtone = amp(-13.5) * (1800 / hz) ** 2  # high notes are purer
        tone = np.sin(phase) + overtone * np.sin(2 * phase)
        trill = np.clip(t / fall, 0, 1) * np.sin(2 * np.pi * TRILL_HZ * t)
        flutter = amp(1.8 * wobble(220, len(t)) + 3 * trill)
        add(out, s - rise, amp(db) * swell(t, edge=0.12) * unit(flutter) * tone)
    return out


def puffs():
    """A wing pushes the air and draws it back: a soft thud of about one cycle."""
    out = np.zeros(N)
    half = .05
    for s, db, hz in PUFFS:
        cycles = hz * (clock(2 * half) - half)
        shape = np.exp(-(cycles / PUFF_CYCLES) ** 2)
        add(out, s - half, amp(db) * shape * np.sin(2 * np.pi * (cycles + rng.random())))
    return out


def wings():
    """Before a clap the upstroke whirrs at a falling pitch; after it the downstroke swishes through the feathers."""
    whirr, swish = np.zeros((2, N))
    for s, _, up_db, down_db in WINGBEATS:
        up_hz = UP_HZ * 2 ** -np.interp(up_db, UP_DROP_DB, (0, UP_DROP_OCTAVES))
        strokes = [(-UP_LEAD_S, UP_S, up_hz, up_db + UP_TONE_DB, up_db + UP_SWISH_DB),
                   (DOWN_LAG_S, DOWN_S, DOWN_HZ, down_db + DOWN_TONE_DB, down_db + DOWN_SWISH_DB)]
        for lag, length, hz, tone_db, swish_db in strokes:
            stretch, detune = 1 + STROKE_SPREAD * rng.uniform(-1.03, 1, 2)
            t = clock(length * stretch)
            shape = unit(swell(t, edge=0.65) * amp(1.8 * wobble(106, len(t))))
            pitch = hz * detune * np.exp(-.55 * (t / t[-1] - .5))
            tone = np.sin(phase_of(pitch, jitter=0.11, rate=534))
            add(whirr, s + lag, amp(tone_db) * shape * tone)
            add(swish, s + lag, amp(swish_db) * shape * rng.standard_normal(len(t)))
    return whirr + colour(swish, SWISH)


def claps():
    """Wing tips brush, then slap together: a sharp snap of quills over a papery body."""
    out, brush = np.zeros((2, N))
    t = clock(BRUSH_S)
    for s, db, _, _ in WINGBEATS:
        rub = t / BRUSH_S * rng.standard_normal(len(t))
        snap = struck(burst(decay=.0024, bounce=.7, crack=.5), SNAP)
        body = struck(burst(decay=0.0042, bounce=0.54, crack=0.28), BODY)
        add(brush, s - BRUSH_S, amp(db + BRUSH_DB) * rub)
        add(out, s, amp(db + 8.5) * snap)
        add(out, s, amp(db + 5.0) * body)
    return out + colour(brush, SNAP)


def thin_notes():
    """Each thin note slides onto its pitch, creeps upward and sags as it fades."""
    out = np.zeros(N)
    for s, length, hz, start, db, rough in THIN_NOTES:
        t = clock(length)
        attack = np.minimum(t / THIN_ATTACK_S, 1)
        release = np.minimum((length - t) / THIN_RELEASE_S, 1)
        slide = (start - 1) * np.exp(-t / THIN_SETTLE_S)
        drift = THIN_CLIMB_PER_S * t + THIN_WANDER * wobble(32.0, len(t))
        pitch = hz * (1 + slide + drift - THIN_SAG * (1 - release))
        tone = whistle(pitch, jitter=rough, rate=500, overtone_db=-30)
        flicker = unit(amp(1.9 * wobble(47.5, len(t))))
        add(out, s, amp(db) * flicker * attack * release * tone)
    return out


def hen_squawks():
    """A startled hen: short, gliding, very unsteady harmonics."""
    out, k = np.zeros(N), np.arange(1, 9)[:, None]
    for s, length, start_hz, end_hz, db, bright_db in SQUAWKS:
        t = clock(length)
        hz = np.linspace(start_hz, end_hz, len(t))
        throat = amp(along(SQUAWK_THROAT, k * hz) + bright_db * (k > 2))
        phase = phase_of(hz, jitter=.04, rate=800)
        partials = np.sin(k * phase + rng.uniform(0, 2 * np.pi, k.shape))
        voice = unit((throat * partials).sum(0) * amp(3 * wobble(250, len(t))))
        add(out, s, amp(db) * swell(t, edge=0.51) * voice)
    return out


def cock():
    """A crow far off: a whistle that is fairly clear at first and then hoarse with pitch jitter."""
    s, hz, db, rough = np.transpose(CROW)
    t = s[0] + clock(s[-1] - s[0])
    pitch, jitter = np.interp(t, s, hz), np.interp(t, s, rough)
    tone = whistle(pitch, jitter=jitter, rate=880, overtone_db=-36)
    out = np.zeros(N)
    add(out, s[0], amp(np.interp(t, s, db)) * swell(t, edge=0.0155) * tone)
    return out


def scene():
    """The birds in their pen, direct and off the fence, over the background."""
    contacts = claps() + clicks() + wings() + puffs() + scrapes()
    voices = peeps() + hen_clucks() + thin_notes() + cock() + rattles() + hen_squawks()
    birds = contacts + voices
    return (birds + fence(amp(-11.5) * birds) + background())[None]


def record(dry):
    """The microphone port rings in the treble; the deep bass is cut and nothing is kept above the band limit."""
    size = next_fast_len(N + SR // 2)
    hz = np.fft.rfftfreq(size, 1 / SR)
    resonance = 1j * hz * MIC_WIDTH_HZ / (MIC_HZ ** 2 - hz ** 2 + 1j * hz * MIC_WIDTH_HZ)
    port = 1 + (amp(MIC_DB) - 1) * resonance
    low_cut = hz ** 3 / (hz ** 3 + LOW_HZ ** 3)
    return irfft(rfft(dry, size) * port * low_cut * (hz < TOP_HZ), size)[:, :N]


dry = scene()
out = record(dry)
unload_audio(out)
```